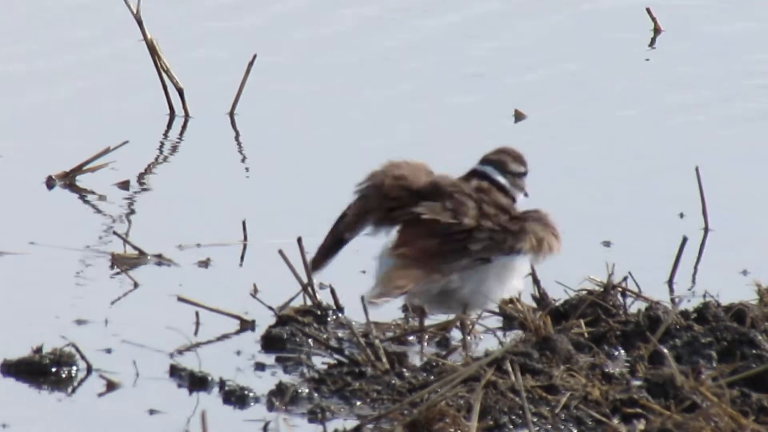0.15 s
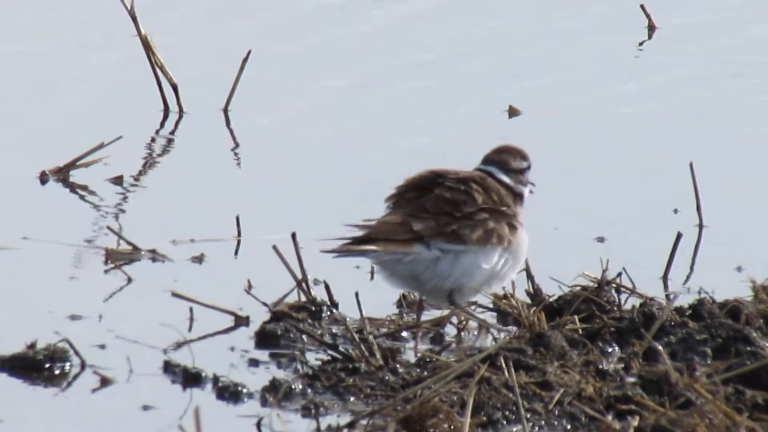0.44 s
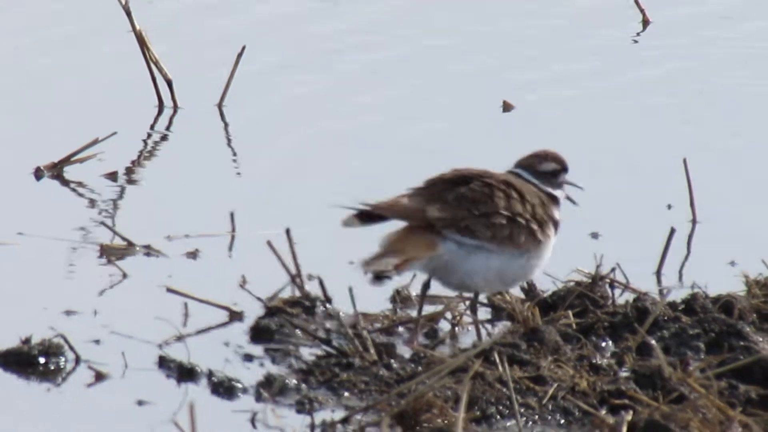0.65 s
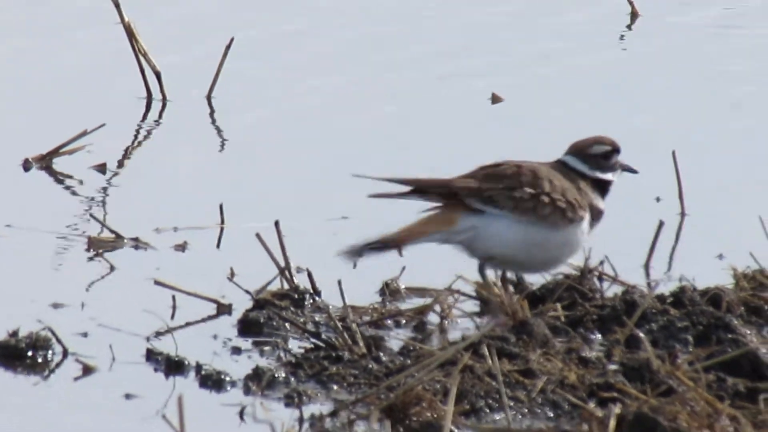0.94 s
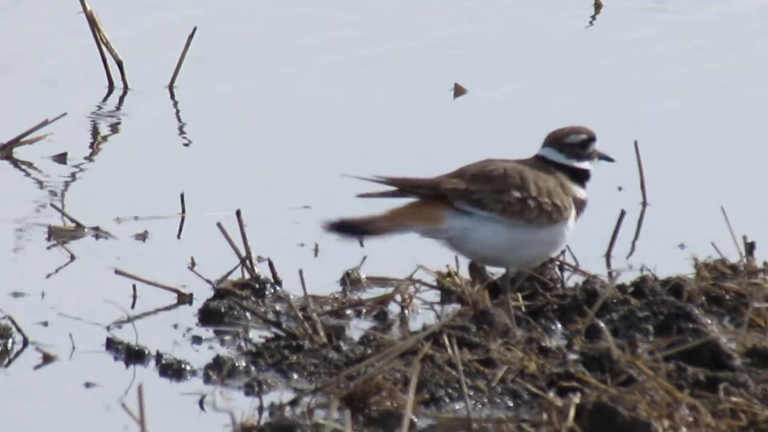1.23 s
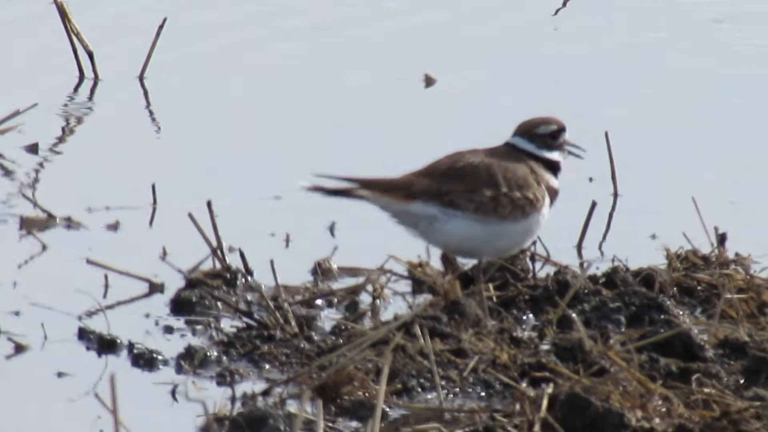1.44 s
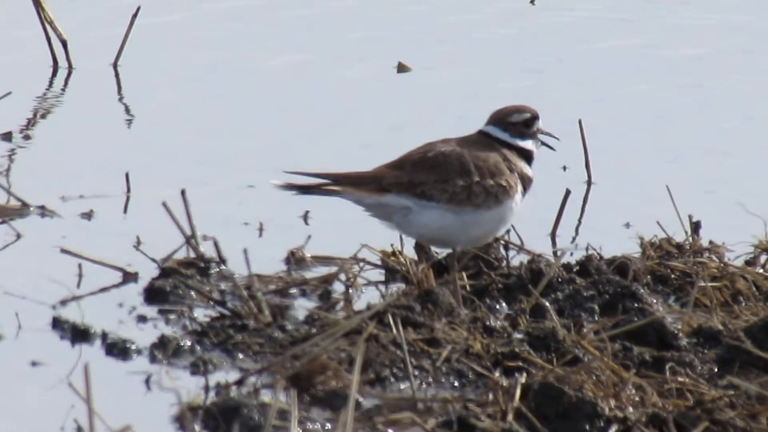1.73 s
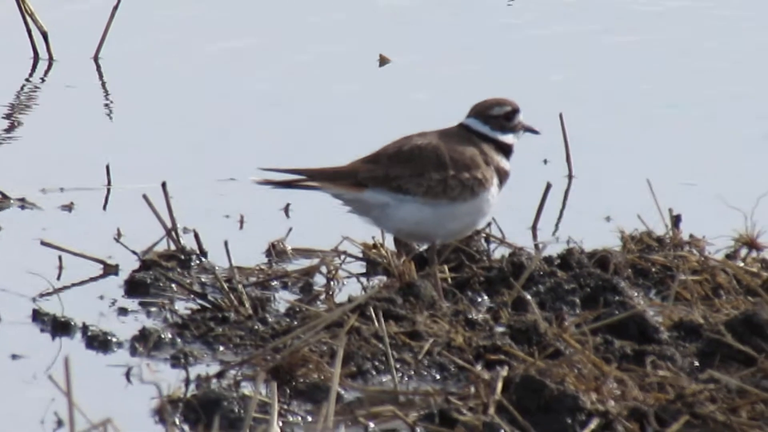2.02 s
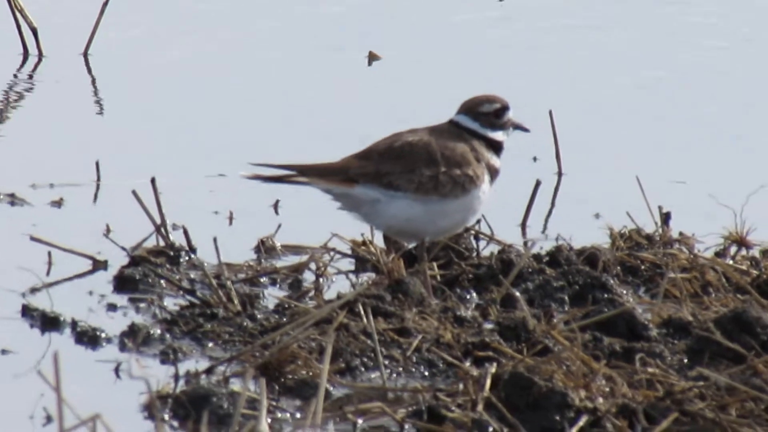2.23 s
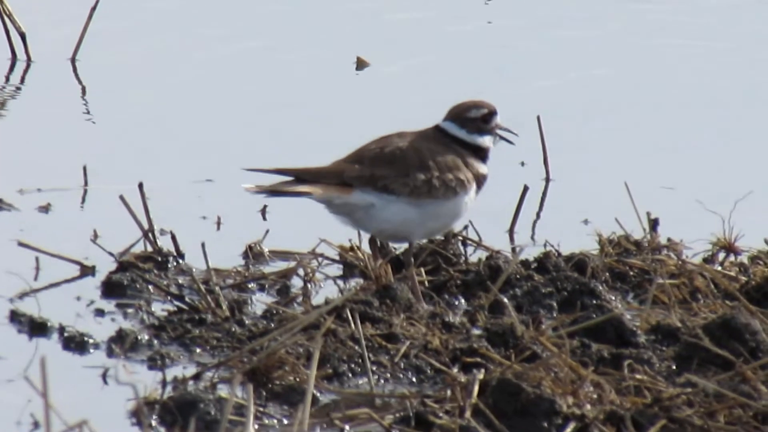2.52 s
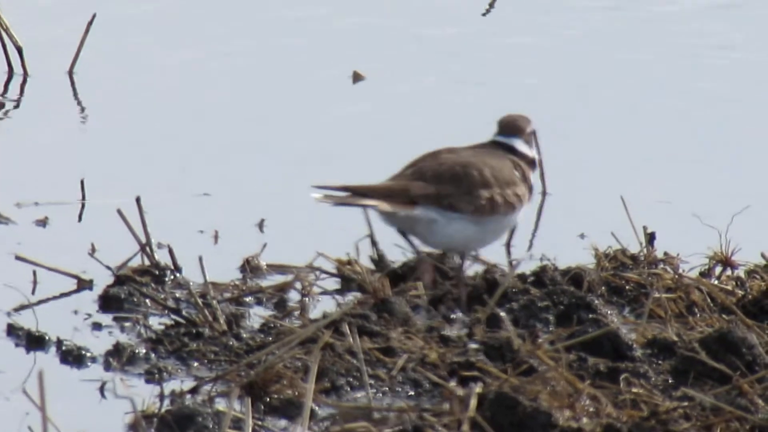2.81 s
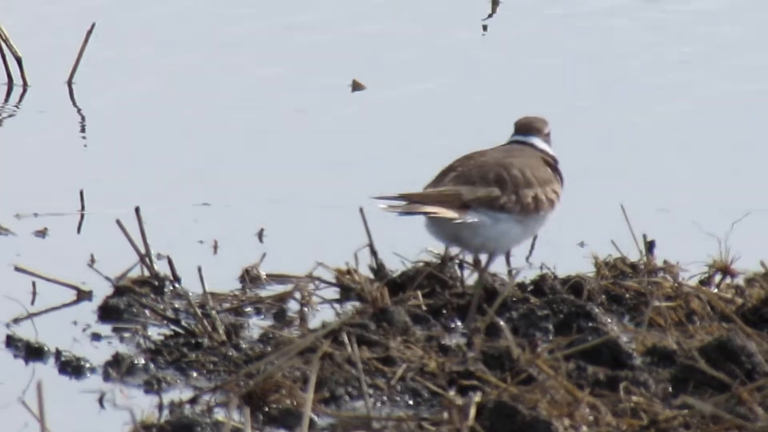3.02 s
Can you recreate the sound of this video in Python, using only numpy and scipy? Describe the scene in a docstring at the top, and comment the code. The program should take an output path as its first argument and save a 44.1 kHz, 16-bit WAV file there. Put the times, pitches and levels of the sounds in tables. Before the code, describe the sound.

Shrill plover whistles fill the stretch. A thinner, farther bird starts at once and calls throughout; a nearer, overtone-rich one joins at 0.5 seconds, calling again around 1.5 and 2.4. Each short dipping note leads into a higher arched, falling one, with faint smeared echoes. A close camera knock at 2.1 precedes weaker ticks at 2.25 and 2.4. Wind, traffic and engine hum rumble low, the hum swelling near 2.

```python
"""Two plovers call over a flooded field. A further, thinner one starts at once; half a second in comes a near one
with a rich stack of overtones. Both whistle gliding partials; a far bank returns each call once, and it smears over
the water. After two seconds the camera body knocks, then ticks twice more faintly, beside the left-right microphone
pair: noise bursts, ringing tones and snaps. Under it all wind and distant traffic rumble as coloured noise, and a far
engine hums as noise in narrow resonances, its upper line swelling at about two seconds."""
import sys
import numpy as np
from scipy import signal
from scipy.fft import rfft, irfft
from scipy.io import wavfile

SR = 44100
rng = np.random.default_rng(int(sys.argv[2]) if len(sys.argv) > 2 else 0)


def master(y):
    """Save y as 16-bit WAV."""
    cut = np.clip(np.atleast_2d(y).T, -1, 1)
    pcm = np.round(cut * 32767)  # scale
    wavfile.write(sys.argv[1], SR, pcm.astype(np.int16))


def ratio_of_db(decibels):
    """Turn decibels (scalar or array-like) into linear amplitude factors; 0 dB maps to 1."""
    return 10 ** (np.asarray(decibels, float) / 20)


N = 138915   # samples, 3.15 s

# The near bird's calls, one list per call. Each row: time in seconds, pitch in Hz, level in dB,
# level change of the partials above the second, in dB.
NEAR_CALLS = [
    [(0.488, 2166, -52, -9.0), (0.495, 2280, -32.5, -5), (0.503, 2305, -32.5, -4.5),
     (0.512, 2230, -33.5, -3.5), (0.52, 2060, -35, -8), (0.53, 1885, -51, -9.0), (0.545, 1870, -54, -2),
     (0.6, 1944, -46, -9.0), (0.645, 1994, -43, -10), (0.668, 1990, -46.5, -7.4)],
    [(0.703, 1990, -49, -9.0), (0.71, 2119, -29, -8), (0.724, 2235, -35.5, 3.5), (0.745, 2170, -30, -1.5),
     (0.795, 2073, -32, 0.5), (0.85, 1875, -42.5, -1.5), (0.875, 1810, -51, 15.5), (0.94, 1681, -43, -4),
     (0.95, 1722, -36.5, -4)],
    [(1.472, 2294, -39, 6), (1.484, 2360, -29.5, -2.5), (1.495, 2147, -36.5, 7.5), (1.512, 1900, -50.5, -4),
     (1.6, 1980, -44.5, -5), (1.65, 2057, -39.5, -2.5), (1.683, 1990, -51.5, 0), (1.695, 2160, -36.5, 0),
     (1.708, 2249, -38.5, 5), (1.755, 2178, -36, 1), (1.8, 2042, -40, -0.5), (1.85, 1805, -49.5, 3),
     (1.893, 1707, -53, -4)],
    [(2.402, 2244, -41, 4), (2.414, 2353, -31, -1.5), (2.428, 2153, -37, 2.5), (2.445, 1888, -51.5, -2.5),
     (2.54, 1961, -44, -0.5), (2.605, 2004, -46, -1), (2.628, 2184, -35.5, 4.5), (2.655, 2143, -37, 2),
     (2.7, 2068, -36, 1.5), (2.75, 1880, -40.5, -8.5), (2.785, 1730, -54, 5.5), (2.82, 1718, -47.5, -1),
     (2.858, 1798, -49.5, 6.5), (2.897, 1787, -47, 1.5), (2.935, 1644, -57, 6)],
]
# How strong each whistled partial is, lowest first. Each entry: dB added to the level of the call.
NEAR_PARTIALS = [-10.5, 0, -17, -18, -21, -20, -43]
# How the camera body shades the two microphones from the near bird.
# Each row: frequency in Hz, left minus right in dB, left lead in radians.
NEAR_SHADE = [(1900, -8, .2), (2400, -1, .5), (3300, -3, 1.2), (3480, 0, 1.7), (3700, 7, -.1), (4050, 2, 0),
              (4250, -4.5, .6), (4550, -2, 1.7), (4680, 10, -.6), (5300, 0, -.2), (8400, -1.5, .3),
              (9400, 7.5, -.4), (10000, -8, -.8), (10800, -1, .1), (11400, -6, 0), (12000, -1, .4)]


def near_plover():
    """A rich, steady whistle: seven partials ride on one gliding pitch."""
    return whistle(NEAR_CALLS, NEAR_PARTIALS, NEAR_SHADE, pitch_waver=0.0014, level_waver_db=0.6)


# The far bird's first notes, falling and rising. Each row: time in seconds, pitch in Hz, level in dB.
FAR_DIPS = [
    [(0.366, 2232, -45), (0.38, 2315, -42.5), (0.393, 2283, -43.5), (0.416, 1990, -43), (0.436, 1955, -61),
     (0.452, 1986, -46.5), (0.48, 2017, -41.5), (0.525, 2090, -51)],
    [(1.105, 2177, -32.5), (1.113, 2332, -44), (1.127, 2325, -34), (1.14, 2247, -41.5),
     (1.157, 1983, -44.5), (1.225, 2093, -41.5), (1.27, 2127, -52.5)],
    [(1.735, 2250, -37), (1.752, 2253, -37), (1.775, 2032, -42), (1.79, 1998, -42), (1.82, 2037, -40.5),
     (1.858, 2083, -37), (1.866, 2062, -38)],
    [(2.478, 2201, -46), (2.487, 2316, -34), (2.502, 2312, -31.5), (2.524, 2017, -42.5), (2.56, 1977, -43),
     (2.605, 2081, -37), (2.64, 2053, -47.5), (2.653, 1873, -58)],
    [(2.933, 2117, -45), (2.942, 2267, -34), (2.953, 2290, -36.5), (2.97, 2187, -40), (2.997, 1998, -37),
     (3.04, 2016, -38), (3.083, 2035, -49), (3.097, 1900, -40)],
]
# The far bird's arched second notes. Each row: time in seconds, pitch in Hz, level in dB.
FAR_ARCS = [
    [(0.0, 2120, -37.5), (0.045, 1726, -62), (0.07, 1720, -56)],
    [(0.55, 1948, -47), (0.562, 2033, -43), (0.582, 2206, -38), (0.62, 2128, -43), (0.65, 1997, -44),
     (0.7, 1630, -54.5)],
    [(1.327, 1846, -42), (1.338, 2117, -41), (1.352, 2267, -41), (1.38, 2275, -39.5), (1.42, 2197, -40),
     (1.46, 1890, -43), (1.495, 1594, -47)],
    [(1.943, 1866, -42), (1.953, 2160, -42.5), (1.967, 2259, -39), (2.04, 2263, -36.5), (2.075, 2086, -39),
     (2.1, 1998, -42.5), (2.142, 1650, -47)],
    [(3.135, 1830, -52), (3.149, 2150, -25)],
]
# How strong each whistled partial is, lowest first. Each entry: dB added to the level of the call.
FAR_PARTIALS = [-17.5, -1.5, -23, -23]
# How the camera body shades the two microphones from the far bird.
# Each row: frequency in Hz, left minus right in dB, left lead in radians.
FAR_SHADE = [(1900, -6, .4), (2400, 0, 1), (3450, -2, 1.5), (3800, 1, 0), (4300, -3, 1), (4750, 3, 2.2),
             (5500, 1, -.6), (8500, -2, 1.9)]


def far_plover():
    """A thinner whistle of four partials that wavers more."""
    return whistle(FAR_DIPS + FAR_ARCS, FAR_PARTIALS, FAR_SHADE, pitch_waver=0.0028, level_waver_db=2.77)


def whistle(calls, partials, shade, pitch_waver, level_waver_db):
    """Whole-number partials on one wavering pitch; balance and phase of each follow its frequency."""
    edge_s = 0.005   # each call fades over this long on either side of its first and last point
    full_voice_db, dulling = -16.5, 0.15   # dB lost per dB below full voice, per partial above the fourth
    first_db_per_octave = 9   # the first partial thins out on low notes
    out = np.zeros((2, N))
    time = np.arange(N) / SR
    bend = 1 + pitch_waver * drift(64.0)
    flutter_db = level_waver_db * drift(56.0)
    for rows in calls:
        start_s, end_s = rows[0][0], rows[-1][0]
        a = max(int((start_s - edge_s) * SR), 0)
        b = min(int((end_s + edge_s) * SR), N)
        t = time[a:b]
        hz = glide(rows, t) * bend[a:b]
        fade = np.clip(np.minimum(t - start_s, end_s - t) / edge_s / 2 + 0.5, 0, 1) ** 2
        effort_db = in_time(rows, column=2)[a:b]
        level = np.sqrt(2) * fade * ratio_of_db(effort_db + flutter_db[a:b])
        upper_db = in_time(rows, column=3)[a:b] if len(rows[0]) > 3 else 0
        turn = 2 * np.pi * np.cumsum(hz) / SR
        for k, partial_db in enumerate(partials, 1):
            db = partial_db + dulling * max(k - 4, 0) * (effort_db - full_voice_db)
            if k > 2:
                db = db + upper_db
            if k == 1:
                db = db + first_db_per_octave * np.log2(hz / hz.max())
            half_db = at_hz(shade, k * hz) / 2
            lead = at_hz(shade, k * hz, column=2)
            out[0, a:b] += level * ratio_of_db(db + half_db) * np.sin(k * turn + lead)
            out[1, a:b] += level * ratio_of_db(db - half_db) * np.sin(k * turn)
    return out


def field(near, far):
    """One smeared echo from the far bank and a dull scattered tail, weaker for the near bird."""
    bank_s, bank_spread_s, bank_db = 0.165, 0.028, -18.5
    tail_db, near_drier_db, tail_t60_s = -1.5, -7.5, 0.056   # t60: time to fall by 60 dB
    haze_db, haze_t60_s = -15, 0.5   # a longer, fainter part of the tail
    t = np.arange(SR) / SR
    bank_noise, tail_noise = rng.standard_normal((2, 2, SR))
    bank = np.exp(-((t - bank_s) / bank_spread_s) ** 2)
    bank = ratio_of_db(bank_db) * bank_noise * bank / np.linalg.norm(bank)
    tail = ratio_of_db(-60 * t / tail_t60_s) + ratio_of_db(haze_db - 60 * t / haze_t60_s)
    tail = tail * (t > 0.004)
    tail = ratio_of_db(tail_db) * tail_noise * tail / np.linalg.norm(tail)
    to_bank = (near + far).mean(axis=0)[None]
    to_water = (ratio_of_db(near_drier_db) * near + far).mean(axis=0)[None]
    echo = signal.fftconvolve(to_bank, bank, axes=1)
    scatter = signal.fftconvolve(to_water, tail, axes=1)
    dull = signal.butter(2, 5500, fs=SR, output="sos")
    return signal.sosfilt(dull, echo + scatter)[:, :N]


# The knock and the two ticks. Each row: time in seconds, level of rattle and body in dB,
# treble tilt in dB per octave, share of the full ring time, level of the snap in dB.
CLICKS = [(2.064, -18, 1.94, 0.99, -13), (2.2539, -32, -2.5, 0.51, -22), (2.386, -35.5, -1.5, 0.24, -37.5)]


def camera():
    """Each click is dying noise, a ringing body and a short snap; it reaches the right side first."""
    pan_db, left_lag_s, attack_s = -8, 0.00105, 0.0003   # pan: left minus right
    snap_hz, snap_t60_s = 1500, 0.006
    size = 8192
    t = np.arange(size) / SR
    out = np.zeros((2, N + SR))
    for s, db, tilt_db, ring, snap_db in CLICKS:
        burst = ratio_of_db(3.5) * rattle(t, tilt_db, ring, pan_db)
        body = ratio_of_db(-6.5) * body_ring(t, tilt_db, ring)
        click = ratio_of_db(db) * (burst + body) * np.clip(t / attack_s, 0, 1)
        side_db = pan_db * np.array([[0.5], [-0.5]])
        snap = ratio_of_db(snap_db + side_db - 60 * t / snap_t60_s) * np.sin(2 * np.pi * snap_hz * t)
        click = click - snap
        for side, lag in enumerate([left_lag_s, 0]):
            i = int((s + lag) * SR)
            out[side, i:i + size] += click[side]
    return out[:, :N]


# Colour of the rattle before tilting; only its shape counts. Each row: frequency in Hz, relative level in dB.
RATTLE = [(88, -37), (150, 4), (771, 1), (2040, -10.5), (3320, -18), (5400, -16.5), (8980, -24),
          (15800, -26)]
# How long the rattle rings at full ring time. Each row: frequency in Hz, time to fall by 60 dB in seconds.
RATTLE_T60_S = [(200, 0.042), (800, 0.052), (2500, 0.048), (12000, 0.012)]


def rattle(t, tilt_db, ring, pan_db):
    """A burst of noise in half-octave bands, each dying at its own speed."""
    shaded_above_hz = 700   # the left side hears less of the click above this
    hz = np.arange(len(t) // 2 + 1) * SR / len(t)
    edges = 140 * 2 ** np.arange(0, 7.1, 0.5)
    balance_db = pan_db * np.clip(np.log2(hz / shaded_above_hz + 1e-9), 0, 1)
    colour_db = at_hz(RATTLE, hz) + tilt_db * np.log2(hz / 1000 + 0.0054)
    noise = pair(0.8, balance_db, bass_lead(hz), size=len(t)) * ratio_of_db(colour_db)
    burst = 0
    for lo, hi in zip(edges, edges[1:]):
        band = irfft(noise * (hz >= lo) * (hz < hi))
        t60 = ring * at_hz(RATTLE_T60_S, np.sqrt(lo * hi))
        burst = burst + band * ratio_of_db(-60 * t / t60)
    return burst / np.std(irfft(noise))


# Tones of the camera body. Each row: frequency in Hz, relative level in dB before tilting,
# time to fall by 60 dB at full ring time in seconds.
BODY = [(324, 4.5, 0.11), (568, -2, 0.064), (844, 8, 0.024), (1150, -5, 0.04)]


def body_ring(t, tilt_db, ring):
    """The struck body rings as a few dying sine tones, each a little louder or softer by chance."""
    out = 0
    for f, db, t60 in BODY:
        db = db + tilt_db * np.log2(f / 1000) + rng.normal(0, 0.97)
        phase = np.array([[bass_lead(f)], [0]])
        out = out + ratio_of_db(db - 60 * t / t60 / ring) * np.sin(2 * np.pi * f * t + phase)
    return out


def bass_lead(hz):
    """Left lead in radians: low notes travel through the body and get there sooner than the treble."""
    lead_s, bass_top_hz = 0.00074, 900
    return 2 * np.pi * np.minimum(hz, bass_top_hz) * lead_s


# Colour of wind and traffic; only its shape counts. Each row: frequency in Hz, relative level in dB.
AIR = [(18, -37), (30, 1), (198, -4), (523, -8.5), (612, -11.5), (931, -18), (1310, -22), (1940, -29.5),
       (2150, -31), (3540, -36.5), (4980, -40.5), (15800, -49)]
# How alike the two sides are. Each row: frequency in Hz, likeness from 0 to 1.
AIR_LIKENESS = [(500, .9), (900, .7), (3000, .5), (5500, .85)]
# Which side is louder. Each row: frequency in Hz, left minus right in dB.
AIR_BALANCE = [(40, 3), (150, 0), (350, -.4), (520, 4), (800, -8), (1100, -7), (1250, -3), (1600, -7),
               (2500, -3.5), (4500, -.3)]
# Which side is ahead. Each row: frequency in Hz, left lead in radians.
AIR_PHASE = [(40, -2), (110, -1.3), (300, -.9), (480, -1.2), (620, -3.1), (780, -3.4), (1000, -6.2),
             (1300, -8.4), (1650, -9.5), (1900, -12.5)]


def air():
    """Wind and traffic: broad rumble and hiss, alike in the bass, gusting slightly."""
    level_db, gust_db = -40, 0.58
    hz = np.arange(N // 2 + 1) * SR / N
    both = pair(at_hz(AIR_LIKENESS, hz), at_hz(AIR_BALANCE, hz), at_hz(AIR_PHASE, hz), size=N)
    colour_db = at_hz(AIR, hz) - edge_loss_db(hz)
    return rms_one(irfft(both * ratio_of_db(colour_db), N)) * ratio_of_db(level_db + gust_db * drift(3.6))


def edge_loss_db(hz):
    """Loss in dB below a low corner and above a steep top cutoff."""
    low_hz, top_hz = 41, 15600
    return 10 * np.log10(1 + (low_hz / (hz + 1)) ** 8 + (hz / top_hz) ** 80)


# The steady lines of the far engine. Each row: frequency in Hz, width in Hz, level in dB.
HUM = [(94.4, 9.7, -50.5), (104.4, 12, -61.5)]
# The engine's upper line, about an octave higher. Each row: time in seconds, level in dB.
HUM_OCTAVE_LEVEL = [(0, -56.5), (1.9, -55), (2.1, -43.5), (3.15, -52)]


def hum():
    """Wavering low engine lines: noise in narrow resonances."""
    out = 0
    for f, width, db in HUM:
        out = out + ratio_of_db(db) * hum_line(f, width)
    return out + ratio_of_db(in_time(HUM_OCTAVE_LEVEL, column=1)) * hum_line(192.6, 18)


def hum_line(f, width):
    """Noise through one narrow resonance: the narrower it is, the slower it wavers."""
    hz = np.arange(N // 2 + 1) * SR / N
    noise = pair(0.81, 0, -1.25, size=N)
    return rms_one(irfft(noise / (1 + (2 * (hz - f) / width) ** 2), N))


def rms_one(x):
    """Scales to an average strength (rms) of 1."""
    return x / np.sqrt(np.mean(x ** 2) + 1e-20)


def at_hz(points, hz, column=1):
    """Reads a table column between its frequencies, on a logarithmic scale."""
    points = np.array(points)
    return np.interp(np.log(hz + 1), np.log(points[:, 0]), points[:, column])


def in_time(rows, column):
    """Reads a table column at every sample, in straight lines between its times."""
    rows = np.array(rows)
    return np.interp(np.arange(N) / SR, rows[:, 0], rows[:, column])


def drift(rate):
    """Smooth chance wandering of spread 1: noise through two equal low-passes at rate Hz."""
    r = np.exp(-2 * np.pi * rate / SR)
    smooth = signal.lfilter([1], [1, -2 * r, r * r], rng.standard_normal(N + SR))
    return rms_one(smooth[SR:])


def pair(likeness, balance_db, phase, size):
    """Spectra of a left and a right noise with given likeness, balance and left lead in radians."""
    a, b = rfft(rng.standard_normal((2, size)))
    alike = np.clip(likeness, 0, 1)
    left = (alike * a + np.sqrt(1 - alike ** 2) * b) * np.exp(1j * phase)
    return np.array([left * ratio_of_db(balance_db / 2), a * ratio_of_db(-balance_db / 2)])


def glide(rows, t):
    """Pitch passes smoothly through the points, never overshooting."""
    s, hz = np.array(rows)[:, :2].T
    step = np.maximum(np.diff(s), 1e-4)
    rise = np.diff(hz) / step
    # flat at peaks and dips, elsewhere the harmonic mean of the slopes on either side
    inner = 2 * np.maximum(rise[1:] * rise[:-1], 0) / (rise[1:] + rise[:-1] + 1e-9)
    slope = np.r_[rise[0], inner, rise[-1]]
    i = np.clip(np.searchsorted(s, t) - 1, 0, len(step) - 1)
    u = np.clip((t - s[i]) / step[i], 0, 1)
    ease = u * u * (3 - 2 * u)
    curve = step[i] * u * (1 - u) * ((1 - u) * slope[i] - u * slope[i + 1])
    return hz[i] + ease * (hz[i + 1] - hz[i]) + curve


def scene():
    """Birds with their echoes, the camera and the background."""
    near = near_plover()
    far = far_plover()
    return near + far + field(near, far) + camera() + air() + hum()


def low_pass(x):
    """Removes everything above the highest recorded frequency."""
    return signal.sosfilt(signal.butter(12, 16320, fs=SR, output="sos"), x)


def record(dry):
    """Turns the finished mix into the final sound."""
    return low_pass(dry)


dry = scene()
out = record(dry)
master(out)
```